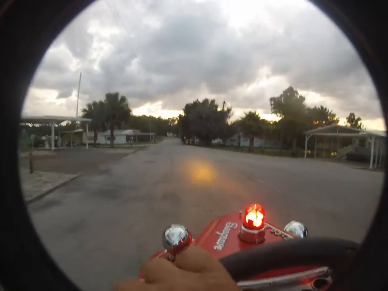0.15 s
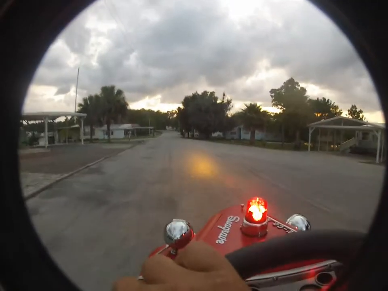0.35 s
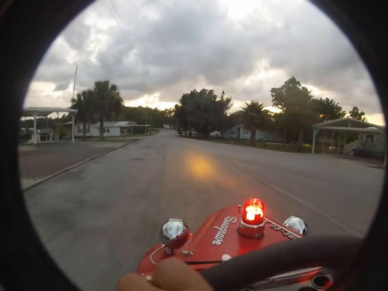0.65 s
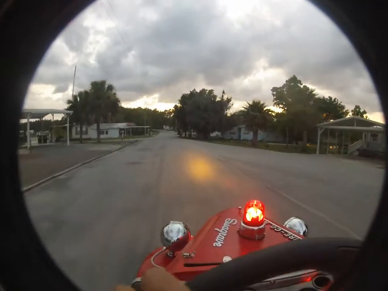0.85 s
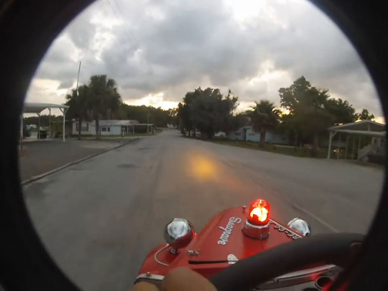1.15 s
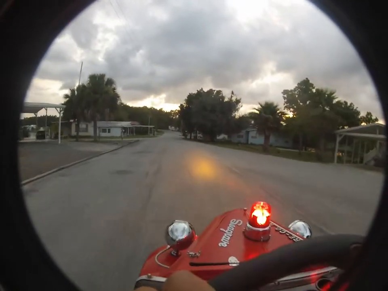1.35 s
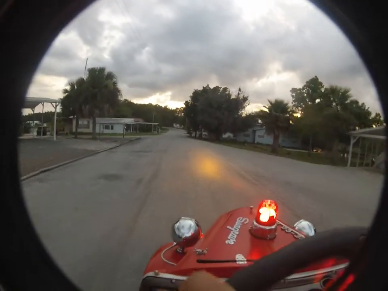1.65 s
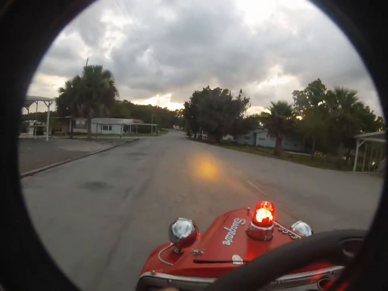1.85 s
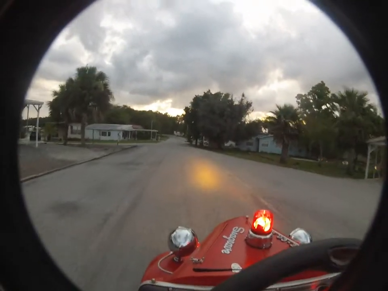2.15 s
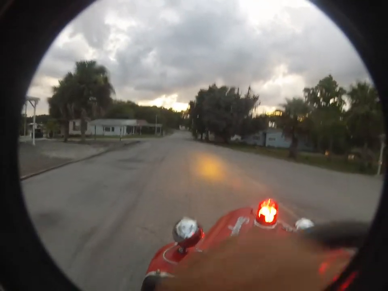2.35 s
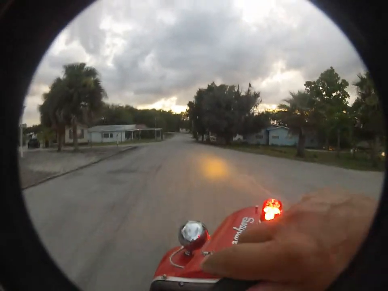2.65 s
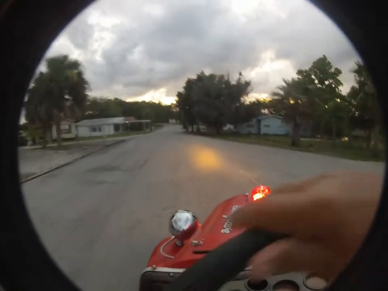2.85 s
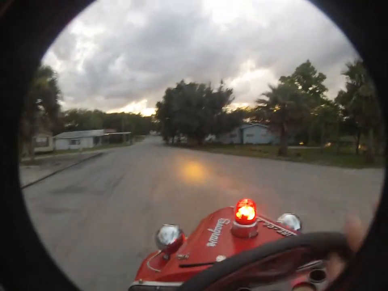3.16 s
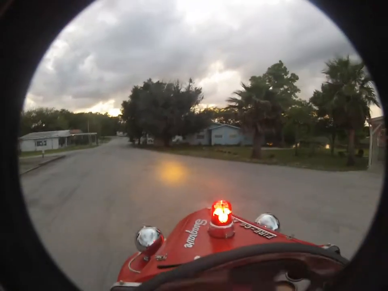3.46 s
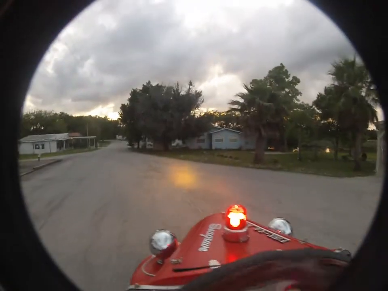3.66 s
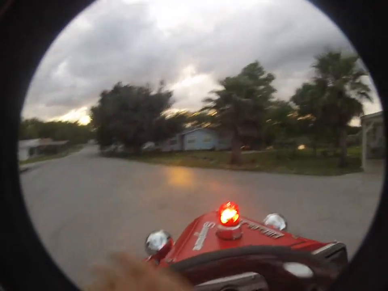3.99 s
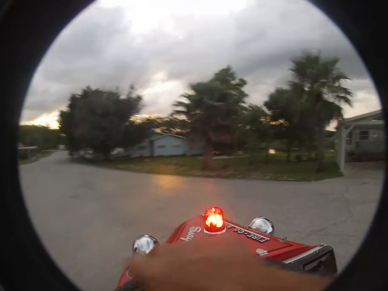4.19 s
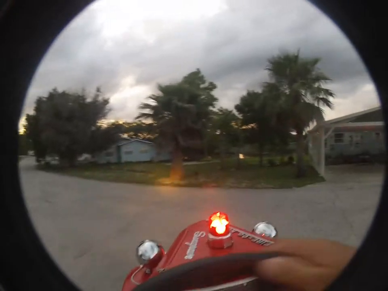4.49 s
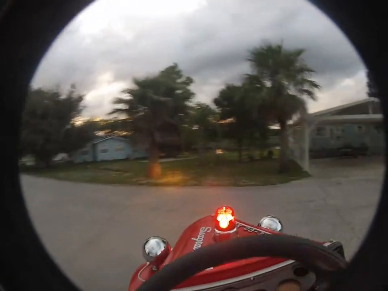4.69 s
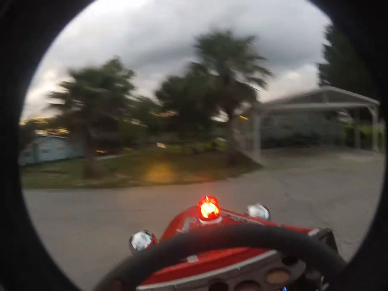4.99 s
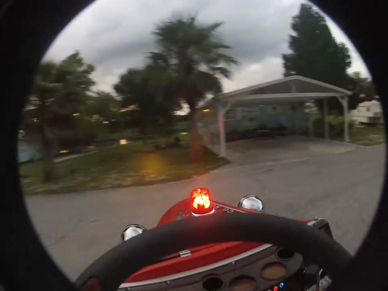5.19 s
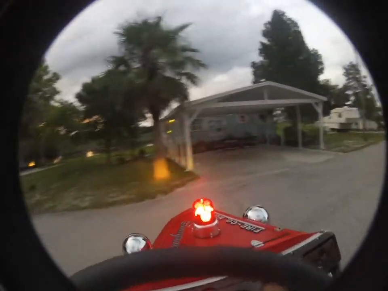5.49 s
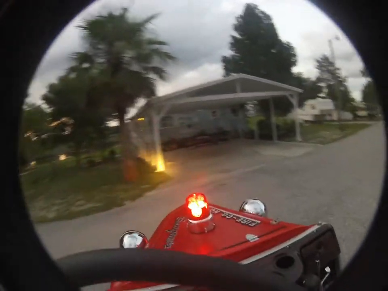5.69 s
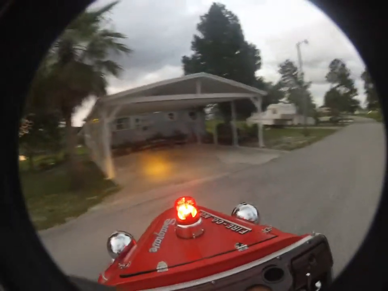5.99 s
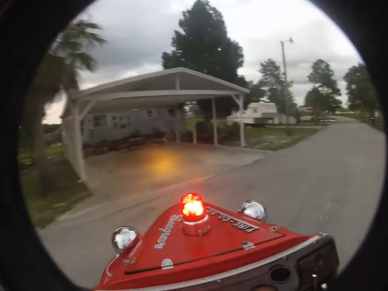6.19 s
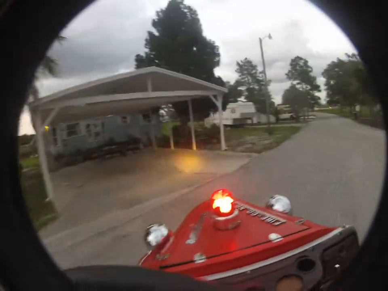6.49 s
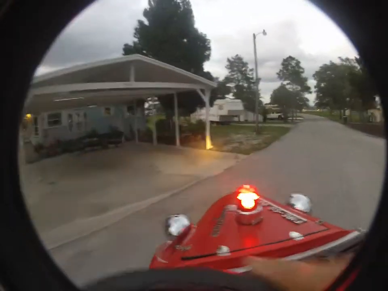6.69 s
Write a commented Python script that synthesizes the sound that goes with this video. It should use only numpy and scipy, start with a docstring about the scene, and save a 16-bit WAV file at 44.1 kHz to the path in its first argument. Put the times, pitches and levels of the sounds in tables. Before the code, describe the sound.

Close on board a small battery ride-on truck on an asphalt street, a hollow low boom and panel drone run throughout. Soft thuds mark bumps, hard tyres rush over grit, and loose fittings tick and rattle. Midway the rumble eases, then the steering clacks sharply in a bend; a thin motor whine comes and goes before rougher, heavier bumps end the ride. Open air, no echo, coarse treble.

```python
"""Road grain drums on the hollow body of a small battery ride-on truck, heard from the driver's seat.
Shaken resonances make its booms and drones; decaying tones make the thuds of bumps in the asphalt.
Tyres rush and crunch grit as coloured noise; loose fittings rattle in bursts that ring narrow bands.
The motor whines faintly as a tone with sidebands in a band of whirr, and the steering chirps once.
The small camera samples slowly and holds each sample, which mirrors the sound into the treble."""
import sys
import numpy as np
from scipy.fft import rfft, irfft, next_fast_len
from scipy.io import wavfile
from scipy.ndimage import uniform_filter1d, map_coordinates

SR = 44100
rng = np.random.default_rng(int(sys.argv[2]) if len(sys.argv) > 2 else 0)


def transcribe(u):
    """Save the signal u as a 16-bit wav file named by the first command-line argument.

    u: samples, shape (n,) or (channels, n), limited to [-1, 1]; the rate is SR.
    q: integer samples, one column per channel.
    """
    v = np.clip(np.atleast_2d(u).T, -1, 1)
    q = np.round(v * 32767).astype(np.int16)
    wavfile.write(sys.argv[1], SR, q)


N = 301644

# shaking caused by the roughness of the asphalt, before each layer's own trim: (t/s, level/dB)
ROAD_SHAKING = [(0, -30.5), (.37, -29), (.65, -28.6), (1.8, -28.7), (2.25, -29), (2.45, -26.8), (2.78, -25),
                (3.2, -30), (3.55, -30.7), (3.95, -32.7), (4.35, -31.8), (4.8, -32.5), (5.5, -29),
                (6.08, -23.3), (6.35, -27), (6.7, -23), (6.84, -23.8)]
# steering load through the bend: (t/s, load from 0 to 1)
STEERING_LOAD = [(0, 0.24), (3.3, 0.41), (3.9, 0.5), (4.3, 0.55), (4.55, 0.86), (5.0, 0.5), (5.3, 0.57),
                 (6.4, 0.35), (6.84, 0.15)]
# resonances of the loose fittings: (f/Hz, width/Hz, gain/dB)
FITTING_MODES = [(1740, 150, -5), (2410, 940, 1), (2930, 63, 2), (3220, 270, -1.5), (3695, 80, 6),
                 (4330, 100, 7), (5070, 200, -7), (5880, 490, 0)]


def amp(db):
    """Decibels to gain."""
    return 10 ** (np.asarray(db) / 20)


def unit(x):
    """x at rms 1."""
    return x / np.sqrt(np.mean(x ** 2) + 1e-20)


def curves(rows):
    """One value per sample for each column after the time."""
    s, *cols = np.transpose(rows)
    return [np.interp(np.arange(N) / SR, s, c) for c in cols]


def wobble(rate):
    """A smooth random curve, rate knots a second."""
    knots = rng.standard_normal(int(N * rate / SR) + 4)
    return map_coordinates(knots, [np.arange(N) * rate / SR])


def filtered(x, response):
    """x times a complex response of frequency."""
    m = next_fast_len(len(x) + SR // 10)
    spectrum = rfft(x, m) * response(np.fft.rfftfreq(m, 1 / SR))
    return irfft(spectrum, m)[:len(x)]


def coloured(x, spectrum):
    """x shaped by (f/Hz, gain/dB) points joined on a log frequency scale, at rms 1."""
    f, db = np.transpose(spectrum)
    return unit(filtered(x, lambda hz: amp(np.interp(np.log(hz + 1), np.log(f), db))))


def ringing(x, modes):
    """x through causal resonances (f/Hz, width/Hz, gain/dB), side by side."""
    def response(f):
        return sum(amp(db) * 1j * f * w / (c * c - f * f + 1j * f * w) for c, w, db in modes)
    return filtered(x, response)


def wavering(x, rate):
    """x with a randomly drifting pitch, rate knots a second."""
    drift = 0.035 * wobble(rate)  # change of playing speed, as a fraction
    slip = np.cumsum(drift - uniform_filter1d(drift, SR))
    return map_coordinates(x, [np.arange(N) + slip], order=1, mode="mirror")


def stones(rate, spread_db):
    """Random tiny impacts of uneven size, on average rate a second, at rms 1."""
    struck = rng.random(N) < rate / SR
    sign = np.sign(rng.standard_normal(N))
    size = amp(spread_db * np.clip(rng.standard_normal(N), -2, 2))
    return unit(struck * sign * size)


def add(track, s, sound):
    """Mix a sound into the track at time s."""
    part = track[max(round(s * SR), 0):][:len(sound)]
    part += sound[:len(part)]


def roughness():
    """Shaking in dB above that of ordinary asphalt."""
    usual_db = -29.5
    return curves(ROAD_SHAKING)[0] - usual_db


def body():
    """The grain of the asphalt shakes the chassis, booms in the shell and drones in its panels."""
    # booms of the hollow body: (f/Hz, width/Hz, gain/dB)
    boom_modes = [(78.6, 14.5, -3), (112.2, 12.5, -13), (138.7, 20, -5)]
    # drones of the side panels: (f/Hz, width/Hz, gain/dB)
    side_modes = [(223.6, 20, -6.5), (280.4, 33, -1), (401.5, 50, -2), (484.4, 53, -10)]
    # spectrum of the chassis rumble: (f/Hz, gain/dB)
    rumble_spectrum = [(25, -30), (45, -16), (62, 0.5), (100, -1), (125, 2), (165, -2), (220, -19.5),
                       (400, -57)]
    # spectrum of the broad panel drone: (f/Hz, gain/dB)
    drone_spectrum = [(110, -15.5), (170, 1), (215, -0.5), (280, -4.5), (335, -6), (405, -10.5),
                      (490, -17.5), (600, -28), (900, -45.5)]
    # low-mid drone, before its trim and flutter: (t/s, level/dB)
    drone_levels = [(0.0, -36), (0.04, -36), (2.38, -34), (2.42, -29), (2.46, -33.5), (2.84, -32.5),
                    (3.11, -37), (4.67, -42), (6.15, -32), (6.29, -37), (6.71, -27), (6.74, -30.5),
                    (6.84, -29)]
    # deep rumble under the booms: (t/s, level/dB)
    deep_levels = [(0, -41), (.8, -42), (.95, -34.5), (1.25, -42), (2.65, -43), (2.87, -33), (3.3, -42),
                   (3.55, -38), (4.0, -46.5), (5.1, -40.5), (5.65, -34), (6.15, -31), (6.84, -33)]
    # spectrum of that deep rumble: (f/Hz, gain/dB)
    deep_spectrum = [(10, -25), (25, -9), (40, -1), (55, 2), (75, -16), (300, -120)]

    # the shell flexes, so its booms waver in pitch
    boom = wavering(ringing(stones(2500, spread_db=1.5), boom_modes), rate=5)
    boom = coloured(boom, [(30, -41), (70, 4.0), (160, 1.0), (350, -21.0)])
    shake = coloured(stones(4000, spread_db=3.0), rumble_spectrum)
    shell_db = curves(ROAD_SHAKING)[0] + 1.3 * wobble(11)
    shell = amp(shell_db) * (amp(-3.0) * boom + amp(-5.5) * shake)

    drone = coloured(stones(1200, spread_db=3.5), drone_spectrum)
    drone_db = curves(drone_levels)[0] - 0.5 + 0.84 * wobble(14)

    sides = wavering(ringing(stones(900, spread_db=5.5), side_modes), rate=4)
    sides = coloured(sides, [(120, -0.5), (220, 1.5), (480, -3.0), (750, -17.5)])
    # -42 dB on ordinary asphalt, a little more for each dB of shaking
    sides_db = -42 + 0.093 * roughness() + 1.6 * wobble(12)

    deep = amp(curves(deep_levels)[0]) * coloured(stones(600, spread_db=2.5), deep_spectrum)
    return deep + shell + amp(drone_db) * drone + amp(sides_db) * sides


def bumps():
    """Each bump gives the shell a dull thud: a quickly rising, decaying low tone."""
    # bumps in the road: (t/s, level/dB before a 1 dB cut and the swell, f/Hz, 60 dB decay/s)
    thuds = [(.3, -18.5, 77, .5), (.505, -21, 82, .2), (.635, -22, 142, .18), (.719, -18, 163, .12),
             (.955, -22, 80, .4), (.965, -23, 228, .15), (1.255, -23, 82, .3), (1.645, -20, 78, .2),
             (1.94, -22, 72, .3), (2.015, -17, 140, .25), (2.365, -20, 80, .25), (2.408, -17, 275, .11),
             (2.414, -15, 142, .2), (2.682, -14, 145, .08), (2.71, -18, 88, .18), (2.848, -14, 184, .08),
             (2.868, -11.5, 78, .15), (2.885, -28, 570, .05), (3.025, -20, 135, .15),
             (3.195, -19, 138, .15), (3.22, -22, 80, .4), (3.563, -21, 130, .12), (3.57, -22, 80, .14),
             (3.66, -23, 84, .25), (4.295, -20, 84, .3), (4.41, -22, 85, .25), (4.413, -28, 1030, .03),
             (4.889, -27, 400, .07), (5.122, -19, 76, .3), (5.152, -19, 136, .22), (5.315, -22, 80, .3),
             (5.67, -18, 140, .14), (5.73, -18, 72, .45), (5.786, -16, 190, .08), (5.815, -16, 160, .16),
             (5.948, -13, 81, .1), (6.068, -11, 110, .1), (6.115, -13.5, 86, .25), (6.22, -19, 155, .1),
             (6.603, -12, 90, .14), (6.741, -11, 212, .12)]
    out, t = np.zeros(N), np.arange(SR // 2) / SR
    for s, db, hz, decay_s in thuds:
        swell = 1 - np.exp(-t / (0.015 * decay_s))
        fade = amp(db - 1.0 - 60 * t / decay_s)
        add(out, s, fade * swell * np.sin(2 * np.pi * hz * t))
    return out


def tyres():
    """Hard tyres rush over the road and crunch loose grit, hissing more as they scrub in the bend."""
    # loose grit on the asphalt, as the level it adds to the rush: (t/s, level/dB)
    grit = [(0, 1.5), (1.05, 1), (1.6, 1), (2.0, 1.5), (2.35, 3), (2.8, 1), (3.25, -1), (3.6, 0),
            (4.15, -1.5), (4.5, 3), (4.75, -0.5), (5.02, 3), (5.25, -1), (5.8, 0.1), (6.2, 0.5), (6.5, 3.5),
            (6.84, 2.5)]
    # spectrum of the tyre rush: (f/Hz, gain/dB)
    rush_spectrum = [(350, -29), (560, -0.5), (680, 1.5), (770, 0.5), (900, 4.5), (1070, 4), (1300, -5.5),
                     (1650, -9.5), (2300, -20.5), (4000, -60)]
    # spectrum of the grit hiss: (f/Hz, gain/dB)
    hiss_spectrum = [(900, 10.5), (1800, 0.5), (2400, 6), (3100, 2), (4000, 5), (4700, 3.5), (5300, -5),
                     (5650, 8), (6000, -16)]
    scrub_db = 10  # extra grit hiss at full steering load

    grit_db, = curves(grit)
    rush_db = -51 + 0.063 * roughness() + grit_db
    hiss_db = -60 + 1.22 * grit_db + scrub_db * curves(STEERING_LOAD)[0]
    rush = amp(rush_db + 1.4 * wobble(25)) * coloured(stones(3000, spread_db=-1.5), rush_spectrum)
    hiss = amp(hiss_db + 1.64 * wobble(30)) * coloured(rng.standard_normal(N), hiss_spectrum)

    # grit comes in clumps; each piece ticks the fittings and taps the panel
    pieces = stones(160, spread_db=5.5) * amp(1.8 * wobble(14))
    ticks = amp(hiss_db - 7.0) * unit(ringing(pieces, FITTING_MODES))
    taps = amp(rush_db - 5.0) * unit(bonnet(pieces))
    return rush + hiss + ticks + taps


def bonnet(x):
    """Contacts through the ring of the bonnet panel, which damps the treble."""
    # resonances of the bonnet panel: (f/Hz, width/Hz, gain/dB)
    panel_modes = [(414, 286, 14), (680, 75, -4), (1052, 100, 4), (1190, 50, 6), (1560, 170, -5.5)]
    dull_hz = 2600
    return filtered(ringing(x, panel_modes), lambda hz: 1 / (1 + 1j * hz / dull_hz))


def rattle(part, db, knock_db, ring_hz, rise, length):
    """A loose part chatters in a quick dying run of contacts that ring it and knock the bonnet."""
    first_contact, even_share = 1.9, 0.39  # sizes of the first contact and of the steady chatter
    contacts_per_s = 1500  # mean rate of the stronger contacts
    shiver_db, shiver_s = -23, 0.28  # fainter tail and its 60 dB decay
    detune = 0.012  # random spread of the resonances, as a fraction

    t, head = np.arange(SR // 5) / SR, SR // 100
    sign = np.sign(rng.standard_normal(len(t)))
    chatter = sign * (even_share + (rng.random(len(t)) < contacts_per_s / SR))
    fade = amp(-60 * t / length) + amp(shiver_db - 60 * t / shiver_s)
    contacts = chatter * (1 - np.exp(-t / rise)) * fade
    contacts[0] = first_contact

    modes = [(hz * (1 + detune * rng.standard_normal()), width, gain) for hz, width, gain in part]
    # the broad resonance is the dry crack of the contact itself
    ring = ringing(contacts, modes + [(3300, 4700, -6), (ring_hz, 300, 2.5)])
    knock = bonnet(contacts)
    # both are levelled by their first 10 ms
    ring_part = amp(db - 7.5) * ring / np.std(ring[:head])
    return ring_part + amp(knock_db) * knock / np.std(knock[:head])


def rattles():
    """Fittings tick and rattle along the ride, and play in the steering clacks in the bend."""
    # loose fittings: (t/s, ring level/dB before a 7.5 dB cut, bonnet knock level/dB,
    # added ring f/Hz, 60 dB decay of the chatter/s)
    loose_parts = [(0.338, -41.5, -46, 2440, 0.028), (0.9642, -42, -50, 2510, 0.027),
                   (0.9732, -44, -45, 2150, 0.027), (1.0765, -45, -45.5, 2980, .015),
                   (1.1028, -39.5, -40.5, 2720, 0.11), (1.121, -39, -44, 2700, 0.065),
                   (1.2585, -44, -52, 2400, .025), (1.495, -45, -52, 4690, 0.028),
                   (1.6353, -37.5, -44, 4200, 0.061), (1.686, -41, -41, 2120, 0.054),
                   (2.0192, -42, -44, 2180, 0.04), (2.129, -48, -44, 1840, 0.017),
                   (2.142, -35.5, -47, 5200, 0.02), (2.2418, -41, -45, 3900, 0.061),
                   (2.3047, -41, -38.5, 2370, 0.02), (2.367, -36.5, -60, 3830, 0.2),
                   (2.4072, -37, -39.5, 2300, 0.056), (2.4758, -40.5, -48, 1700, .06),
                   (2.5578, -36.5, -43, 4250, 0.036), (2.6806, -39, -51, 2430, 0.038),
                   (2.8846, -47, -43, 2210, .07), (3.002, -35, -44, 3850, 0.022),
                   (3.0987, -43, -56, 2130, .03), (3.2201, -44, -52, 2200, .04),
                   (3.2913, -44, -58, 4700, 0.028), (3.414, -40, -45, 4200, .06),
                   (3.6267, -46, -61, 1900, 0.023), (3.7875, -41.5, -45, 1850, .035),
                   (3.828, -33.5, -40, 4250, 0.072), (3.844, -40, -50, 2760, 0.089),
                   (4.3992, -35.5, -40, 2460, 0.1), (4.414, -36.5, -36, 4200, 0.064),
                   (4.5337, -38, -49, 3580, 0.054), (4.779, -49, -42, 2190, 0.046),
                   (4.8378, -44, -39, 2400, 0.045), (4.857, -53, -41, 2160, 0.022),
                   (4.906, -43, -43, 2490, 0.059), (4.9348, -36, -46, 3770, .06),
                   (5.0126, -42, -40.5, 3740, .06), (5.1293, -37, -39, 2280, 0.076),
                   (5.161, -41, -47, 1980, .03), (5.3071, -35.5, -50, 4940, 0.016),
                   (5.383, -47, -45, 1750, .03), (5.4141, -31, -38, 4300, 0.047),
                   (5.4544, -43, -43, 2560, .12), (5.5167, -42.5, -40, 4300, 0.14),
                   (5.872, -39, -39, 2720, 0.055), (5.9474, -44, -35.5, 2180, 0.071),
                   (5.9623, -42, -51, 5070, 0.034), (6.0477, -44, -56, 2730, 0.036),
                   (6.29, -35, -46, 4030, .045), (6.336, -30.5, -38, 4270, 0.075),
                   (6.352, -34, -57, 3500, 0.07), (6.4002, -39, -41.5, 4400, 0.22),
                   (6.4832, -34.5, -66, 3040, 0.027), (6.5111, -46, -37.5, 2610, 0.046),
                   (6.6035, -36.5, -38.5, 2700, 0.029)]
    # steering clacks: (t/s, ring level/dB before a 7.5 dB cut, bonnet knock level/dB,
    # added ring f/Hz, rise time constant/s, 60 dB decay of the chatter/s)
    clacks = [(4.4705, -22.5, -33, 4800, .0008, 0.087), (4.6296, -21.5, -32, 4700, .003, 0.078),
              (4.888, -26, -30.5, 2000, .001, 0.095), (4.9516, -29, -34, 2450, .002, .11)]
    # resonances of the steering linkage: (f/Hz, width/Hz, gain/dB)
    linkage_modes = [(1510, 700, -6), (2390, 580, 5.5), (3470, 620, 4), (4310, 450, 2.5), (4800, 350, -0.5),
                     (5920, 520, 7.5)]
    rise_s = 0.00034  # time constant for a small fitting

    out = np.zeros(N)
    for s, db, knock_db, ring_hz, length in loose_parts:
        add(out, s, rattle(FITTING_MODES, db, knock_db, ring_hz, rise_s, length))
    for s, db, knock_db, ring_hz, rise, length in clacks:
        add(out, s, rattle(linkage_modes, db, knock_db, ring_hz, rise, length))
    return out


def motor():
    """A thin gear whine follows the speed, inside a narrow band of whirr that grows with the load."""
    # motor speed, as gear mesh pitch before its small wander: (t/s, f/Hz)
    mesh_pitch = [(0, 5000), (3.5, 5010), (3.85, 4992), (3.95, 5045), (4.15, 5055), (4.27, 5085),
                  (4.8, 5000), (5.25, 4920), (5.55, 5015), (5.8, 5055), (5.92, 5078), (6.15, 5068),
                  (6.33, 5092), (6.84, 5075)]
    # spells in which the gears sing: (start t/s, end t/s, level/dB before flutter)
    singing_spells = [(3.5, 3.8, -70), (3.93, 4.3, -63.3), (5.72, 6.5, -63.3)]
    fade_db_per_s = 55  # on both sides of each spell
    shaft_hz, sideband_db = 275, -7

    t = np.arange(N) / SR
    mesh_hz = curves(mesh_pitch)[0] + 5 * wobble(9) + 10 * wobble(150)
    phase = 2 * np.pi * np.cumsum(mesh_hz) / SR
    # each turn of the shaft sways the mesh: weaker lines come and go on both sides of it
    shaft = 2 * np.pi * shaft_hz * t
    lower = amp(3 * wobble(5)) * np.sin(phase - shaft)
    upper = amp(-5 + 3 * wobble(5)) * np.sin(phase + shaft)
    lines = np.sin(phase) + amp(sideband_db) * (lower + upper)
    whine = np.sqrt(2) * lines * amp(1.3 * wobble(26))

    singing = np.zeros(N)
    for start, end, db in singing_spells:
        outside_s = np.abs(t - np.clip(t, start, end))
        singing += amp(db - fade_db_per_s * outside_s)

    whirr_spectrum = [(4000, -15.0), (4650, 4.5), (5000, 3.5), (5300, 6.5), (5900, -39)]
    whirr = coloured(rng.standard_normal(N), whirr_spectrum)
    # -70.5 dB at no load, 17.5 dB more at full load
    whirr_db = -70.5 + 17.5 * curves(STEERING_LOAD)[0]
    return singing * whine + amp(whirr_db) * whirr


def squeak(length=0.04, hz=2950, db=-50):
    """One tiny chirp as the steering turns: a short fading tone."""
    out, t = np.zeros(N), np.arange(int(length * SR)) / SR
    envelope = np.sqrt(np.abs(np.sin(np.pi * t / length))) * np.exp(-t / 0.046)
    add(out, 2.778, amp(db) * envelope * np.sin(2 * np.pi * hz * t))
    return out


def scene():
    """Everything rides with the microphone, close and in the open air, with no echo."""
    return (body() + bumps() + tyres() + rattles() + motor() + squeak())[None]


def record(dry):
    """Band-limit, sample and hold: a mirror image appears on both sides of the hold rate."""
    hold_hz, top_hz = 12000, 15250
    band = filtered(dry[0], lambda hz: 1 / np.sqrt(1 + (hz / 5550) ** 56))
    sampled = band * (1 + 2 * np.cos(2 * np.pi * hold_hz * np.arange(N) / SR))

    def held_response(hz):
        # sinc of a held sample; the top treble is softened above 13.2 kHz
        return np.sinc(hz / hold_hz) * amp(np.interp(hz, [13200, 14000], [0, -7]))
    held = filtered(sampled, held_response)
    return filtered(held, lambda hz: hz < top_hz)[None]


dry = scene()
out = record(dry)
transcribe(out)
```